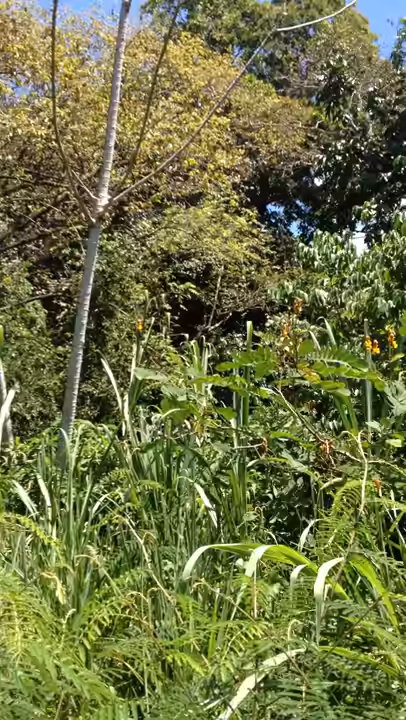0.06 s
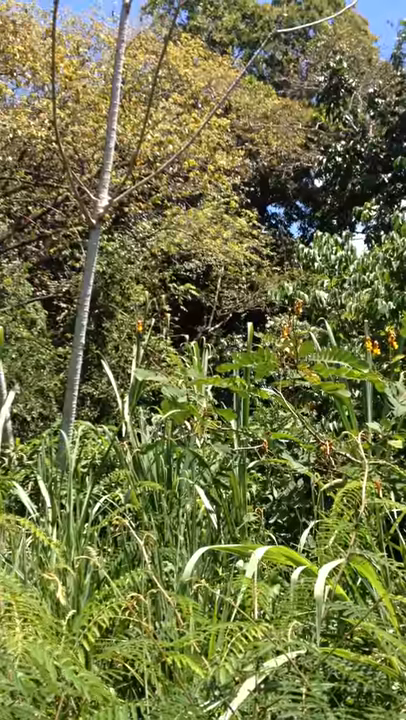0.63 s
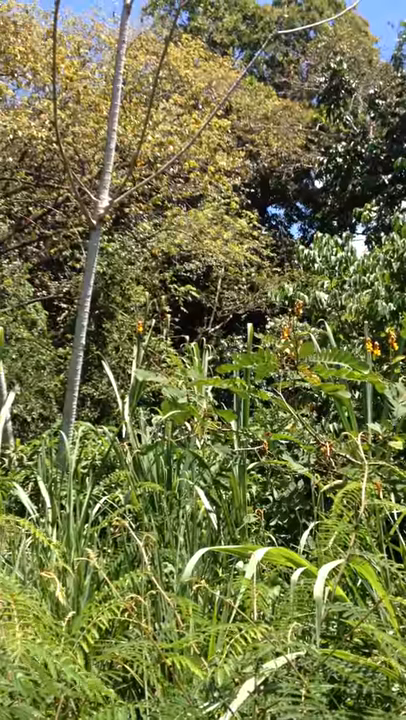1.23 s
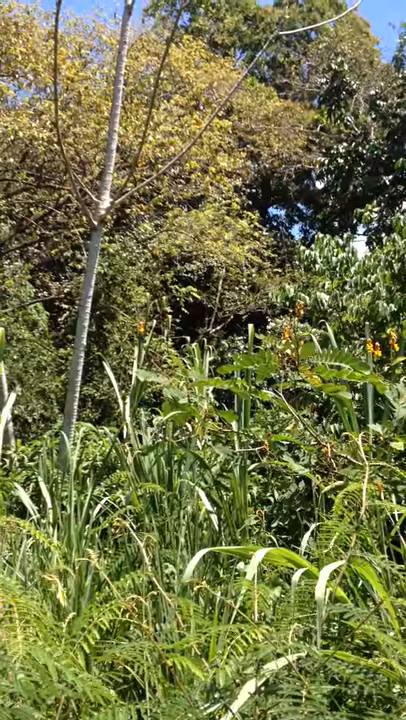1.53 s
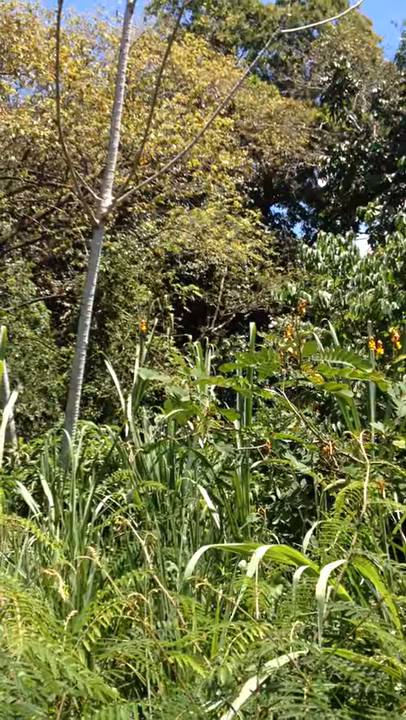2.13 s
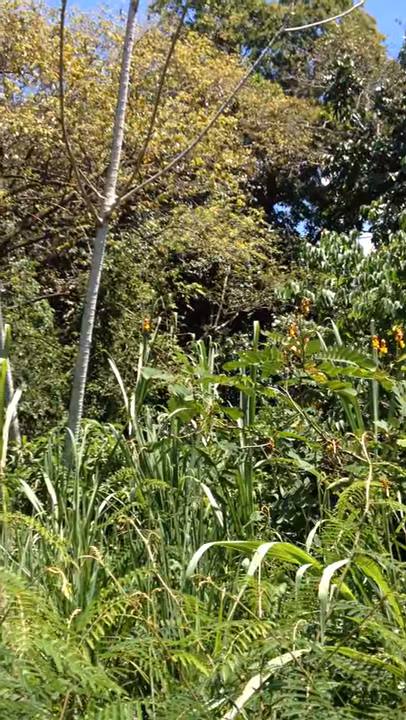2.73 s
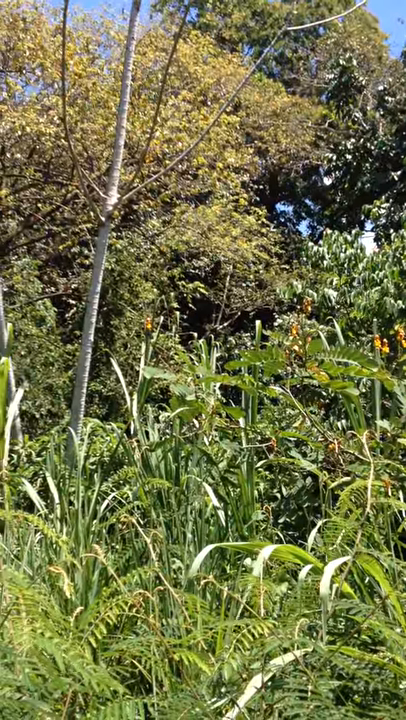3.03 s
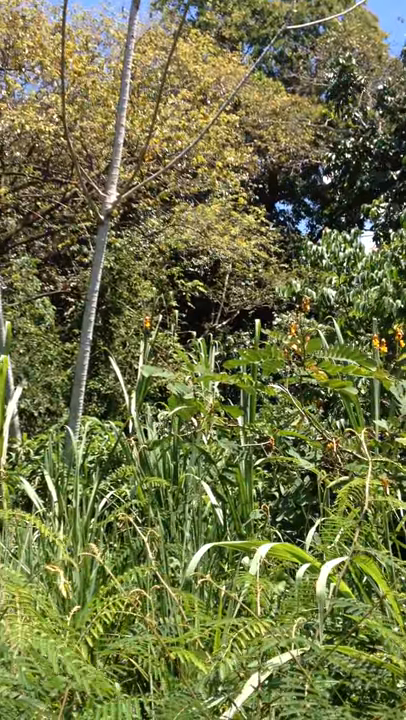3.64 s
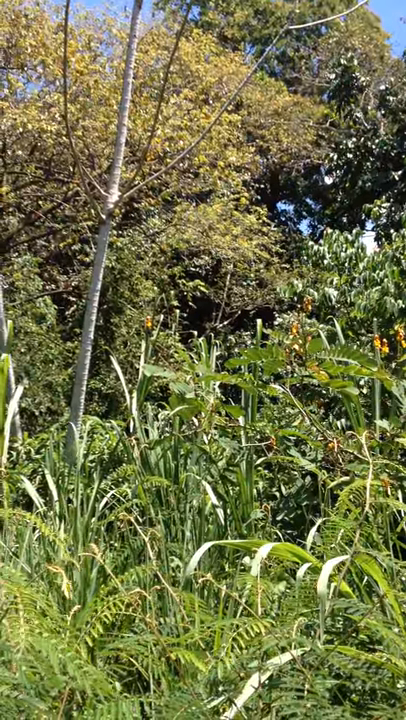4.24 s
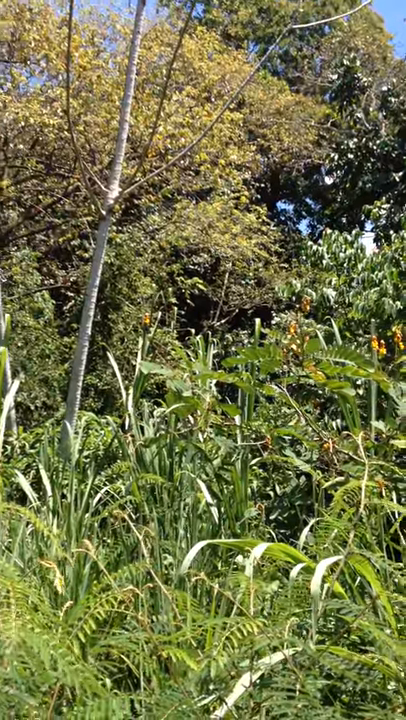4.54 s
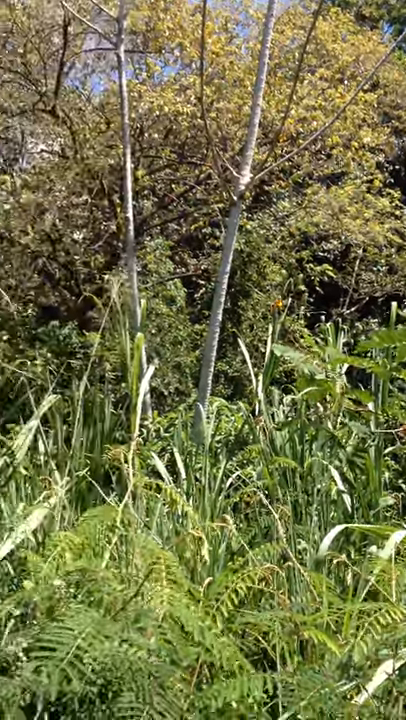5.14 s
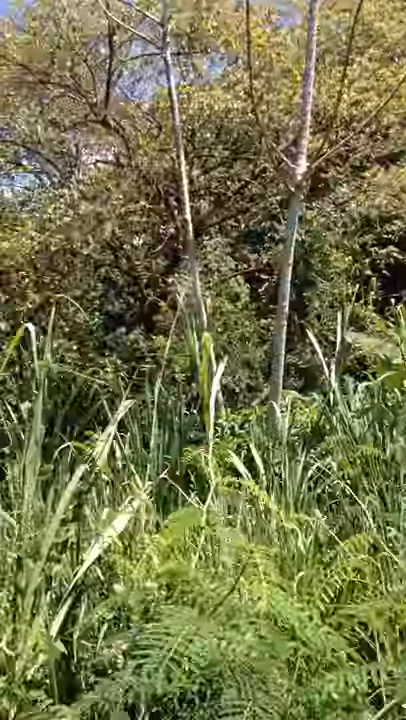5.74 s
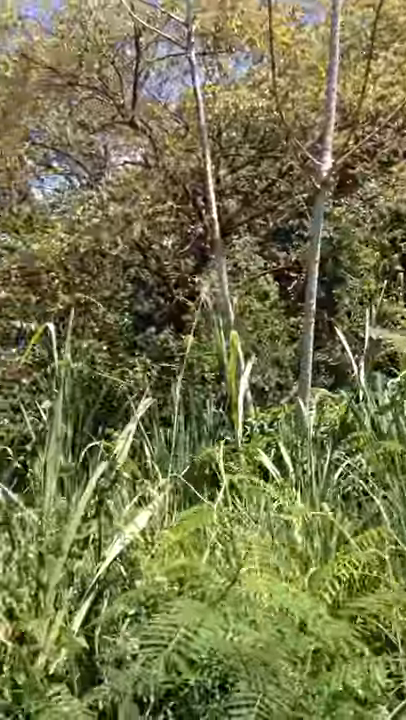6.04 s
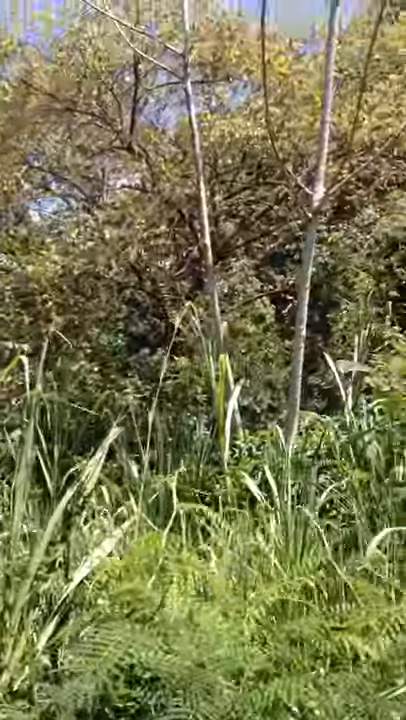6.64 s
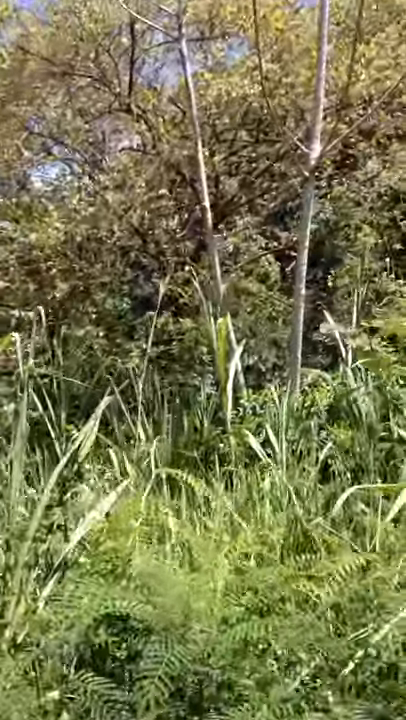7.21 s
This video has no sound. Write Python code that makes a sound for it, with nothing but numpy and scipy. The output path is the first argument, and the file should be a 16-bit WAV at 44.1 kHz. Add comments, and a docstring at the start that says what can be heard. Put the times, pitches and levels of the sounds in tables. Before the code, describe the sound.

Low, hoarse roars from a distant howler monkey open the scene, pumping out and in, then sinking in pitch and dying away within the first third. What remains is a quiet forest: steadily trilling crickets, a fast pulsing bush-cricket chorus and the occasional high chip of a small bird. Underneath lie soft air and leaf hiss and a faint, faraway motor hum, with a few gentle puffs on the microphone.

```python
"""In a forest, a howler monkey roars far off, sinking in pitch until the bout dies away. Its vocal folds
drive the resonances of the throat: raspy, booming out-strokes alternate with rising, hooted in-strokes.
Crickets and a pulsing bush-cricket chorus stridulate throughout. A small bird chips, leaves hiss,
a far motor drones, and light air nudges the microphone. Scattering by the trees adds reverberation."""
import sys
import numpy as np
from scipy import signal
from scipy.fft import rfft, irfft, next_fast_len
from scipy.io import wavfile
from scipy.ndimage import map_coordinates

SR = 44100
rng = np.random.default_rng(int(sys.argv[2]) if len(sys.argv) > 2 else 0)


def unload_wav(signal):
    """Save mono or channel-first audio to the path in sys.argv[1] as 16-bit WAV at rate SR, clipped to [-1, 1]."""
    wavfile.write(
        sys.argv[1],
        SR,
        np.round(np.clip(np.atleast_2d(signal).T, -1, 1) * 32767).astype(np.int16),
    )


N = 325017

# out-strokes of the roar: first boom t/s, last boom t/s, boom count, effort/dB, mid-stroke swell/dB
ROAR_STROKES = [(.005, 0.151, 3, 0, -4), (0.343, .558, 5, 1, -0.5), (0.736, .897, 3, -1, 4),
                (1.067, 1.179, 3, -.5, 1), (1.346, 1.435, 3, -.5, 0.5), (1.572, 1.65, 3, -1.5, -3),
                (1.787, 1.861, 2, -3.5, 0), (1.997, 2.071, 2, -5.5, 2), (2.2, 2.279, 2, -6, 0),
                (2.404, 2.468, 2, -15, 0.5)]
# relaxation of the throat: t/s, frequency scale of its resonances
THROAT_SCALE = [(0, 1.025), (.5, 0.99), (1.15, 0.92), (1.8, .89), (2.5, 0.89)]
# throat resonances, breathing out and in: f/Hz, width/Hz, relative level/dB, exponent of the scale
OUT_FORMANTS = [(362, 130, 0, .9), (794, 112, -1, 1.1), (1243, 120, -13.5, 0), (1917, 120, -18, 0.7),
                (474, 48, -17.5, .9), (627, 68, -16, .6), (3300, 280, -20.5, 0.29), (4300, 1500, -22.5, 0)]
IN_FORMANTS = [(395, 97, -1.5, .5), (648, 83, -8, 0.38), (857, 53, -2, 0.66), (1270, 160, -21.5, -1),
               (1844, 140, -5.5, 0.43), (3180, 580, -11, 0), (4050, 340, -13.5, -0.51)]
# bouts of the insect chorus: first pulse t/s, pulse rate/Hz
INSECT_BOUTS = [(.029, 14.75), (1.527, 14.86), (2.554, 14.79), (5.014, 14.88), (6.231, 15)]
# bands of the far crickets: f/Hz, width/Hz, level/dB
CRICKET_BANDS = [(2817, 87, -55.5), (2746, 56, -53.5), (2884, 170, -56), (2530, 170, -62), (2204, 24, -72)]
# loud chirps of the nearest cricket: t/s, level/dB
LOUD_CHIRPS = [(.8844, -45), (1.8363, -41), (2.2897, -44), (3.122, -46.5), (3.275, -47), (4.2757, -47.5),
               (4.421, -40), (4.7574, -42.5), (5.595, -44), (6.9912, -42)]
# bush-cricket wing resonances: f/Hz, width/Hz, relative level/dB
WING_MODES = [(4460, 140, -64.5), (5086, 210, -59.5), (4740, 960, -53.5), (6090, 2300, -62),
              (6950, 1210, -53), (7950, 136, -60.5), (9210, 450, -61), (14000, 900, -67)]
# bird notes: t/s, duration/s, start f/Hz, end f/Hz, level/dB, direct-path gain/dB
BIRD_NOTES = [(1.534, 0.058, 7920, 8700, -51, -3), (1.9, .14, 7400, 7810, -54.5, -10.5),
              (2.469, 0.053, 8560, 6760, -47.5, 1.5), (3.75, .1, 7700, 9460, -57, -20),
              (5.896, 0.077, 8500, 6780, -50.5, 1)]
# loudness of the motor: t/s, drone level/dB, whine level/dB
MOTOR_LEVELS = [(0, -59, -69), (4.4, -60.5, -73.5), (5.2, -53, -63.5), (5.9, -59.5, -65), (6.4, -55, -56),
                (7.37, -64.5, -71.5)]
# speed of the motor: t/s, firing rate/Hz
FIRING_RATE = [(5.6, 14.5), (6.3, 14.72)]
# low resonances of the motor: f/Hz, width/Hz, relative level/dB
DRONE_MODES = [(146.4, 6.4, -9.5), (166.4, 19.3, -3), (235.3, 46, -6)]
# whining harmonics: multiple of the firing rate, relative level/dB
WHINE_ORDERS = [(24, -3), (28, -5.5), (29, -3)]
# spectra of the forest air and of the leaves: f/Hz, relative spectral density/dB
AIR_SPECTRUM = [(25, -22), (60, -18), (100, -6), (160, 6.5), (300, 5), (700, 3), (1400, -3), (1950, -3.5),
                (2400, 3), (3200, 4), (3700, -3.5), (5000, 1), (8500, -7.5), (15000, -11.5)]
LEAF_SPECTRUM = [(4000, -21), (8500, -7.5), (10000, 6.5), (12000, 5.5), (14000, -1), (15200, -7.5)]
# loudness of the leaves: t/s, level/dB
LEAF_LEVELS = [(0, -60.5), (.9, -64), (2.7, -93), (4.2, -60), (6.4, -54), (7.37, -53)]
# puffs of air on the microphone: t/s, half width/s, level/dB
AIR_PUFFS = [(.38, 0.042, -65), (1.05, .09, -56), (1.44, 0.049, -53.5), (1.59, .023, -52),
             (6.62, .024, -61), (7.3, .1, -76)]
# reverberation among the trees: f/Hz, T60/s
FOREST_T60 = [(200, 1), (2000, 1), (8000, 0.66)]

# each FOLLOWS is the change of a level in dB per dB of effort
VOICE_HZ, SAG_HZ_PER_S, HZ_PER_DB = 395.6, 31, 5
BOOM_DB, BOOM_HALF_S, BOOM_ARCH = -31, 0.0145, 0.0395  # arch: fractional pitch drop at the flanks
RASP_DB, RASP_FADE_DB_PER_S, RASP_FOLLOWS = -34.5, 3, 0.47
MOUTH_DB, CLOSING_DB_PER_S2, MOUTH_FOLLOWS = 0.2, 1.57, 0.3  # gain of the upper formants
OVERHANG_S, TURN_S = 0.022, 0.028  # rasp beyond the booms; pause between boom and in-stroke
HOOT_DB, HOOT_FOLLOWS, HOOT_RATIO, HOOT_RISE_PER_S = -38, 1.05, 0.82, 0.906  # ratio to the boom pitch
WHEEZE_DB, WHEEZE_FADE_DB_PER_S, WHEEZE_FOLLOWS = -41, 4, 0.66
JAW_DIP, JAW_LIFT_PER_S = 0.0245, 0.308  # fractional formant shift: mid-bark, through an in-stroke
CRICKET_HZ, CHIRP_S, CHIRP_EDGE_S = 2829, 0.027, 0.008
SOFT_CHIRP_DB, SOFT_SPREAD_DB = -56.5, 3.5
BUZZ_DB, BUZZ_DRIFT_DB = -55.5, 0.7
SECOND_VOICE_RATIO, SECOND_VOICE_DB = 1.25, -7
ECHO_DB, TOP_HZ = -14, 15250


def out_strokes():
    """Source-filter coupling: the throat sac booms in each bark; the closing mouth cuts upper formants."""
    drive = opening = booms = locked = dip = 0
    for first, last, count, effort_db, swell_db in ROAR_STROKES:
        middle = (first + last) / 2
        rasp_db = RASP_DB - RASP_FADE_DB_PER_S * middle + RASP_FOLLOWS * effort_db
        mouth_db = MOUTH_DB - CLOSING_DB_PER_S2 * middle ** 2 + MOUTH_FOLLOWS * effort_db
        drive += amp(rasp_db) * gate(first - OVERHANG_S, last + OVERHANG_S, edge=0.024)
        opening += amp(rasp_db + mouth_db) * gate(first, last + OVERHANG_S, edge=0.094)
        dip += gate(first, last, edge=last - first)
        for progress in np.linspace(0, 1, round(count)):
            s = first + progress * (last - first)
            hz = voice_hz(s, effort_db) * (1 + 0.02 * rng.standard_normal())
            boom_db = BOOM_DB + effort_db + swell_db * np.sin(np.pi * progress)
            booms += amp(boom_db) * boom(s, hz)
            locked = np.maximum(locked, gate(s - BOOM_HALF_S, s + BOOM_HALF_S, edge=0.029))
    low, *upper = rasp(OUT_FORMANTS, flap_hz=95.17, jaw=1 - JAW_DIP * (dip - 0.5))
    # while the sac booms, the folds lock to it and the low rasp gives way
    return drive * low * (1 - 0.58 * locked) + opening * sum(upper) + booms


def in_strokes():
    """Ingressive phonation: air drawn between barks sounds a rising hoot under a thinner rasp."""
    t, pitch = clock(), np.full(N, HOOT_RATIO * VOICE_HZ)
    hoot_gain, wheeze_gain, jaw = 0, 0, 1
    for previous, (first, _, _, effort_db, _) in zip(ROAR_STROKES, ROAR_STROKES[1:]):
        start, end = previous[1] + TURN_S, first - TURN_S
        middle = (start + end) / 2
        voiced, breath = gate(start, end, edge=0.025), gate(start, end, edge=0.048)
        glide = 1 + HOOT_RISE_PER_S * (t - middle)
        pitch = np.where(voiced > 0, HOOT_RATIO * voice_hz(middle, effort_db) * glide, pitch)
        hoot_gain += amp(HOOT_DB + HOOT_FOLLOWS * effort_db) * voiced
        wheeze_db = WHEEZE_DB - WHEEZE_FADE_DB_PER_S * middle + WHEEZE_FOLLOWS * effort_db
        wheeze_gain += amp(wheeze_db) * breath
        jaw += JAW_LIFT_PER_S * (t - middle) * breath
    phase = phase_of(pitch * (1 + 0.03 * wobble(130)))
    shimmer = amp(2.2 * wobble(80))
    hoot = np.sqrt(2) * (np.sin(phase) + amp(-17.5) * np.sin(2 * phase) + amp(-15.5) * np.sin(3 * phase))
    wheeze = sum(rasp(IN_FORMANTS, flap_hz=109.64, jaw=jaw))
    return hoot_gain * shimmer * hoot + wheeze_gain * wheeze


def rasp(formants, flap_hz, jaw):
    """Forced resonance: chaotic vocal-fold pulses ring formants that shift with jaw and relaxing throat."""
    pulses = pulse_train(flap_hz * np.exp(0.45 * wobble(160))) * amp(3 * wobble(120))
    source = unit(pulses) + rng.standard_normal(N)
    scale, = curves(THROAT_SCALE)
    bands = []
    for hz, width, db, exponent in formants:
        waver = 1 + 0.35 * wobble(30) / np.sqrt(hz)
        position = np.cumsum(scale ** exponent * waver * jaw)  # reading faster raises the formant
        bands.append(amp(db) * np.interp(position, np.arange(N), ring(source, hz, width)))
    return bands


def boom(s, hz):
    """Resonance of the throat sac: a round-topped tone burst at time s, its pitch arching over."""
    offset = (clock() - s) / BOOM_HALF_S
    near = np.abs(offset) < 3
    offset, burst = offset[near], np.zeros(N)
    phase = phase_of(hz * (1 - BOOM_ARCH * offset ** 2)) + 2 * np.pi * rng.random()
    burst[near] = np.sqrt(2) * np.exp(-np.abs(offset) ** 3) * np.cos(phase)
    return burst


def voice_hz(s, effort_db):
    """Pitch declination: the booms sink through the bout and with falling effort."""
    return VOICE_HZ - SAG_HZ_PER_S * s + HZ_PER_DB * effort_db


def crickets():
    """Tonal stridulation: a far chorus trills; the nearest cricket chirps on the beat, at times loudly."""
    pulse = insect_beat(lag=0.62, sharpness=2.5)
    throb = unit(1 + 0.35 * pulse)
    trill = amp(-50.5) * tone(CRICKET_HZ, drift_hz=18, rate=90)
    soft = amp(SOFT_CHIRP_DB) * unit(pulse * amp(SOFT_SPREAD_DB * wobble(12)))
    loud = sum(amp(db) * gate(s - CHIRP_S / 2, s + CHIRP_S / 2, CHIRP_EDGE_S) for s, db in LOUD_CHIRPS)
    far = (noise_bands(CRICKET_BANDS) + trill) * throb
    nearest = np.maximum(soft, loud) * tone(CRICKET_HZ, drift_hz=9.88, rate=15)
    return far + nearest


def bush_crickets():
    """Broadband stridulation: files ring the wings tooth by tooth, pulsing between the crickets' beats."""
    teeth = sum(pulse_train(318.2 * (1 + 0.009 * wobble(170) + 0.008 * wobble(10))) for _ in range(3))
    scrape = unit(teeth) + 1.15 * rng.standard_normal(N)
    wings = tree_scatter(resonate(scrape, WING_MODES))
    pulsing = unit(0.55 + insect_beat(lag=0, sharpness=1.8))
    return unit(wings) * pulsing * amp(BUZZ_DB + BUZZ_DRIFT_DB * wobble(0.54))


def insect_beat(lag, sharpness):
    """Synchrony: the insects share one pulse, of rms 1, that restarts with each bout; lag is in cycles."""
    t = clock()
    first, first_rate = INSECT_BOUTS[0]
    cycles = (t - first) * first_rate
    for s, rate in INSECT_BOUTS:
        cycles = np.where(t > s - 0.5 / rate, (t - s) * rate, cycles)
    return unit(np.abs(np.cos(np.pi * (cycles - lag))) ** sharpness)


def bird():
    """Frequency modulation: thin, fluttering slurs; notes from behind leaves arrive mostly as scatter."""
    sung, direct = np.zeros(N), np.zeros(N)
    for s, length, start_hz, end_hz, db, direct_db in BIRD_NOTES:
        progress = np.linspace(0, 1, int(length * SR))
        pitch = end_hz + (start_hz - end_hz) * (1 - progress) ** 2
        rising = end_hz > start_hz
        flutter = (0.025 if rising else 0.01) * wobble(900)[:len(progress)]
        note = np.sin(phase_of(pitch * (1 + flutter)))
        if rising:  # a hoarse second voice joins in
            note += amp(SECOND_VOICE_DB) * np.sin(phase_of(SECOND_VOICE_RATIO * pitch * (1 + 2 * flutter)))
        note *= amp(db) * np.sqrt(2) * np.sin(np.pi * progress)
        sung[int(s * SR):][:len(note)] += note
        direct[int(s * SR):][:len(note)] += amp(direct_db) * note
    return direct + tree_scatter(sung)


def motor():
    """Periodic excitation: firings, smeared by the trees, drive low resonances; high orders whine."""
    drone_db, whine_db = curves(MOTOR_LEVELS)
    firing_hz, = curves(FIRING_RATE)
    firing = pulse_train(firing_hz)
    chug = 0.6 * firing + unit(tree_scatter(firing)) + 0.5 * rng.standard_normal(N)
    drone = resonate(chug, DRONE_MODES)
    whine = sum(amp(db) * tone(round(order) * firing_hz, drift_hz=1.45, rate=8)
                for order, db in WHINE_ORDERS)
    whine += noise_bands([(375, 230, -2.0)])
    return amp(drone_db) * drone + amp(whine_db) * whine


def moving_air():
    """Flow noise: broadband forest air, hissing leaves and soft, low puffs on the microphone."""
    leaf_db, = curves(LEAF_LEVELS)
    leaves = amp(leaf_db + 0.64 * wobble(15)) * noise(LEAF_SPECTRUM)
    puffs = sum(amp(db) * np.exp(-((clock() - s) / width) ** 2) for s, width, db in AIR_PUFFS)
    buffet = puffs * noise([(25, -26), (60, -3), (110, 11), (170, 2), (400, -45), (1000, -90)])
    air = amp(-51.5 + 0.11 * wobble(3.3)) * noise(AIR_SPECTRUM)
    return air + leaves + buffet


def tree_scatter(x):
    """Reverberation: scatter from trunks and crowns decays exponentially, the treble soonest."""
    hz, t, spectra = signal.stft(rng.standard_normal(SR * 3 // 4), SR, nperseg=256)
    decay = amp(-60 * t / along(FOREST_T60, hz)[:, None])
    _, tail = signal.istft(spectra * decay, SR, nperseg=256)
    return signal.fftconvolve(x, tail / np.linalg.norm(tail))[:N]


def ring(x, hz, width):
    """Resonance: x through four cascaded band-passes, at rms 1."""
    band = 2 * width
    return unit(filtered(x, lambda f: (1j * f * band / (hz * hz - f * f + 1j * f * band)) ** 4))


def resonate(x, modes):
    """Modal superposition: one excitation drives every resonance."""
    return sum(amp(db) * ring(x, hz, width) for hz, width, db in modes)


def noise_bands(bands):
    """Incoherent sum: independent noise drives each resonance."""
    return sum(amp(db) * ring(rng.standard_normal(N), hz, width) for hz, width, db in bands)


def noise(spectrum):
    """Spectral shaping: coloured noise of rms 1."""
    return unit(filtered(rng.standard_normal(N), lambda f: amp(along(spectrum, f))))


def filtered(x, response):
    """Linear filtering: the spectrum of x times a frequency response."""
    size = next_fast_len(N + SR // 2)
    return irfft(rfft(x, size) * response(np.fft.rfftfreq(size, 1 / SR)), size)[:N]


def pulse_train(hz):
    """One impulse a cycle at a varying rate, rms 1."""
    return unit(np.diff(np.floor(np.cumsum(hz) / SR), prepend=0))


def tone(hz, drift_hz, rate):
    """Random frequency modulation of a sine of rms 1."""
    return np.sqrt(2) * np.sin(phase_of(hz + drift_hz * wobble(rate)))


def phase_of(hz):
    """Phase in radians, the time integral of frequency."""
    return 2 * np.pi * np.cumsum(hz) / SR


def gate(start, end, edge):
    """Trapezoidal window with ramps of edge seconds centred on start and end."""
    t = clock()
    return np.clip(np.minimum(t - start, end - t) / edge + 0.5, 0, 1)


def wobble(rate):
    """Smooth random fluctuation, rate knots a second."""
    knots = rng.standard_normal(4096)
    return map_coordinates(knots, [np.arange(N) * rate / SR], mode="wrap")


def along(points, hz):
    """Interpolation of (f/Hz, value) points on a logarithmic frequency axis."""
    f, values = np.transpose(points)
    return np.interp(np.log(hz + 1), np.log(f + 1), values)


def curves(rows):
    """Interpolation in time: one curve for each column after t/s."""
    times, *columns = np.transpose(rows)
    return [np.interp(clock(), times, column) for column in columns]


def amp(db):
    """Amplitude ratio of a level in decibels."""
    return 10 ** (np.asarray(db) / 20)


def unit(x):
    """Normalisation to rms 1."""
    return x / np.sqrt(np.mean(x ** 2) + 1e-20)


def clock():
    """Time of each sample in seconds."""
    return np.arange(N) / SR


def scene():
    """Superposition: the monkey, its reverberation and the rest of the forest add in one channel."""
    monkey = out_strokes() + in_strokes()
    echo = amp(ECHO_DB) * tree_scatter(monkey)
    return (monkey + echo + bird() + crickets() + bush_crickets() + motor() + moving_air())[None]


def record(dry):
    """Band limiting: an ideal low-pass keeps nothing above TOP_HZ."""
    return filtered(dry[0], lambda f: f < TOP_HZ)[None]


dry = scene()
out = record(dry)
unload_wav(out)
```